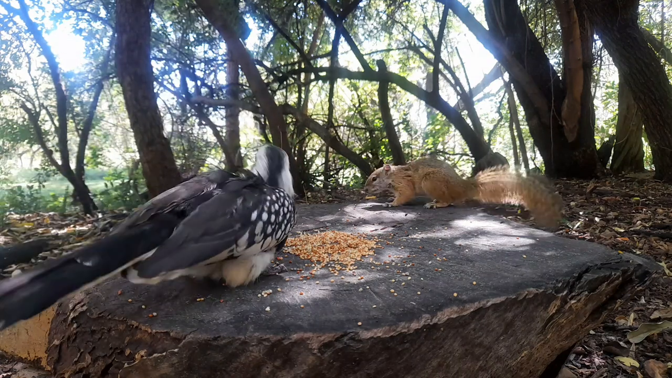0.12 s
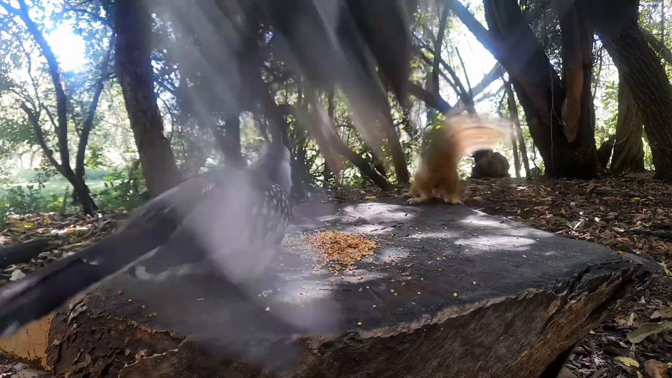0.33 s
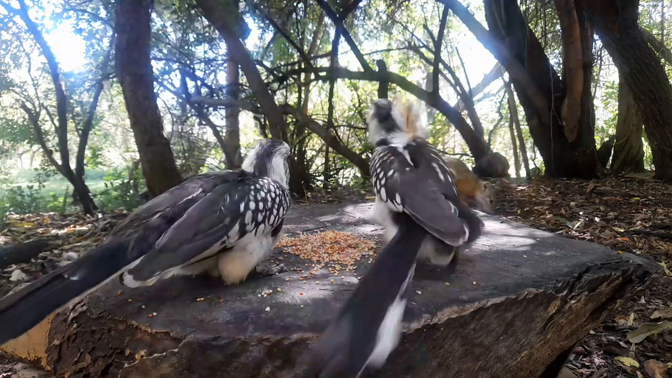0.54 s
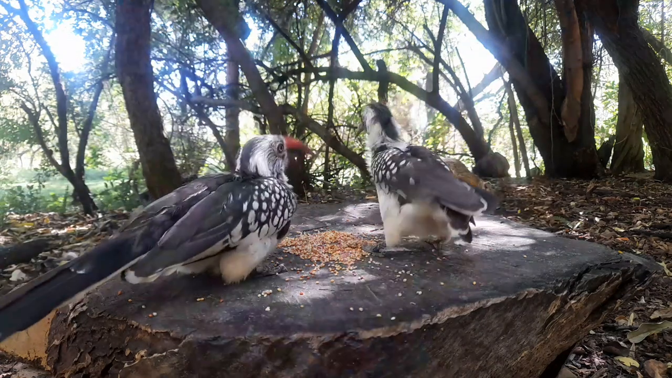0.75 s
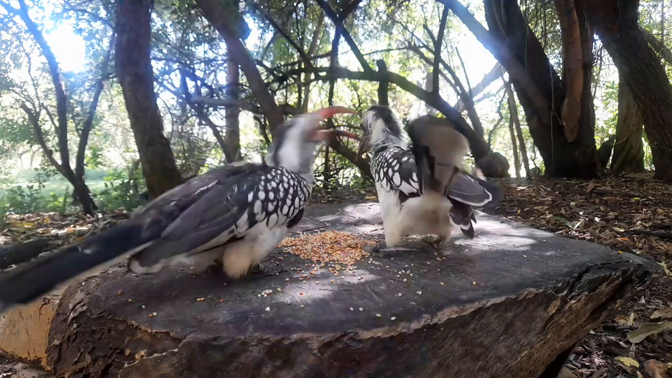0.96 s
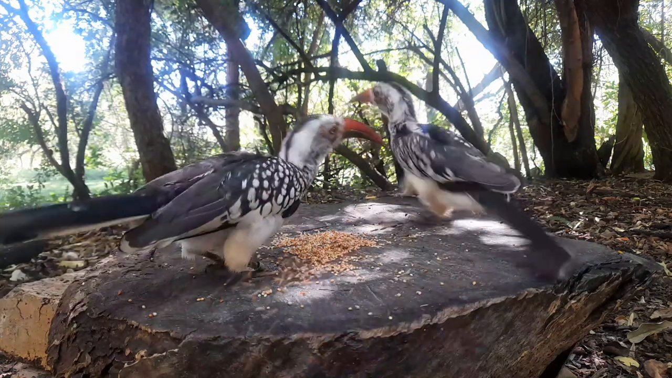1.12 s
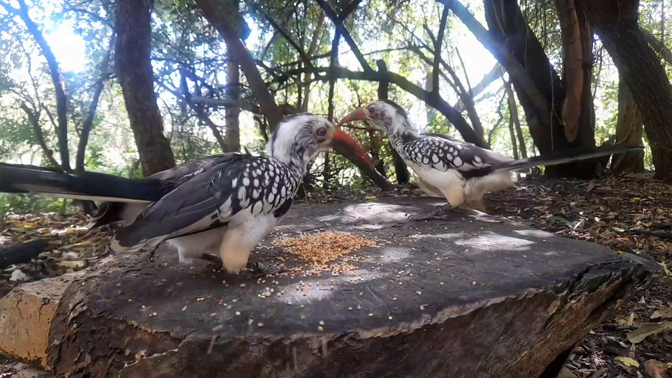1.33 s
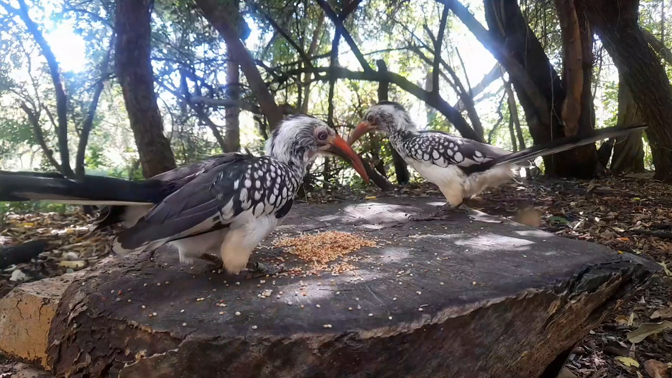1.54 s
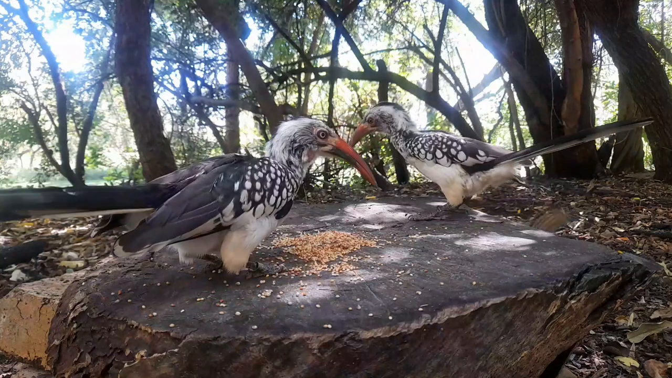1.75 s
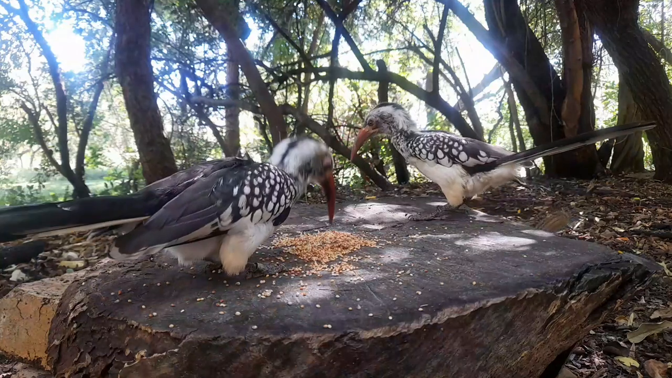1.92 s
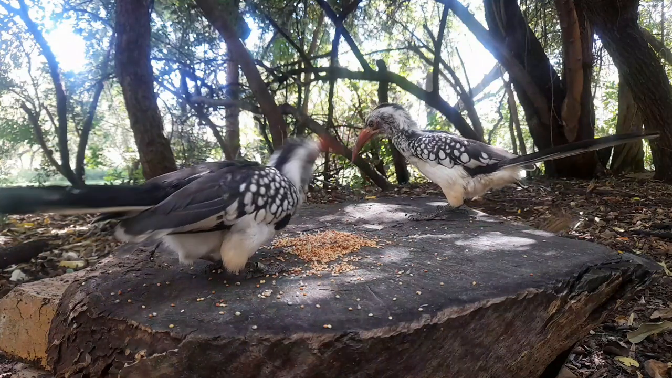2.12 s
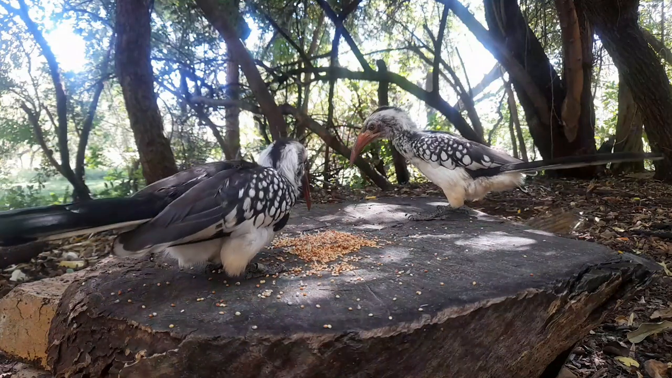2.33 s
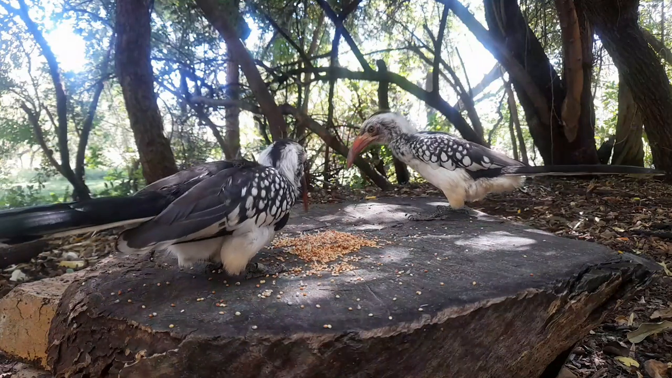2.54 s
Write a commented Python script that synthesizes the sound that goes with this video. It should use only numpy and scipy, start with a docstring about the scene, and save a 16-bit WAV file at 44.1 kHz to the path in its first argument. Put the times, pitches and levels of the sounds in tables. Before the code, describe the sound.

A large bird's wingbeats swish in very close, buffeting the microphone, then slap and thump onto a wooden stump; short clucks, a hop with one sharp flap, scuffs and seed ticks, then quiet woodland with faint hum.

```python
"""Over a faint woodland hiss and a low wavering hum, a hornbill flies in past the microphone.
Its wing strokes swish as band-shaped noise, and soft puffs of noise are its downwash on the microphone.
It lands with slaps and thumps on a seed-strewn stump where another feeds; the birds cluck in gliding tones.
Then it hops with one more flap and grainy scuffs, and seeds tick under its feet as tiny ringing cracks.
The hum swells around the hop, sinks, and swells again at the end."""
import sys
import numpy as np
from scipy import signal
from scipy.fft import rfft, irfft
from scipy.io import wavfile
from scipy.ndimage import uniform_filter1d

SR = 44100
rng = np.random.default_rng(int(sys.argv[2]) if len(sys.argv) > 2 else 0)


def pcm_store(signal):
    """Save signal as 16-bit PCM."""
    levels = np.round(np.clip(np.atleast_2d(signal), -1, 1) * 32767)
    wavfile.write(sys.argv[1], SR, levels.astype(np.int16).T)


N = 114660
T = np.arange(N) / SR  # time in seconds

# Every COLOUR table draws a noise spectrum. Each row: frequency in Hz, level in dB.

# Low hum swelling and sinking. Each row: time in seconds, level in dB.
HUM_LEVEL = [(0, -62), (.82, -66.5), (.95, -56), (1.15, -53.5), (1.45, -52.5), (1.62, -58.5), (1.75, -64),
             (1.97, -70), (2.27, -68.5), (2.43, -58.5), (2.6, -54.5)]
HUM_HZ, HUM_WAVER_SHARE, HUM_OCTAVE_DB = 95.5, 0.015, -23
# Woodland hiss, then low rumble.
AIR_COLOUR = [(130, -2.5), (280, -20.5), (450, -11), (1000, -19.5), (1500, -19.5), (3500, -30.5),
              (6000, -22), (8500, -28.5), (14000, -19)]
RUMBLE_COLOUR = [(20, -41), (40, -11.5), (63, 3), (100, -0.5), (160, -16.5), (300, -18.5), (800, -60.5)]
AIR_DB, RUMBLE_DB = -75, -62.5
ECHO_DB, ECHO_T60_S, ECHO_CUT_HZ = -19.5, 0.17, 5200

# Seeds and claws ticking on wood. Each row: start in seconds, peak in dB before panning,
# left-right difference in dB, ring in Hz.
TICKS = [(0.622, -42.5, 1, 5300), (0.788, -38.5, -6.5, 5100), (1.159, -32, 12, 10870),
         (1.496, -39.5, 17, 7500), (1.544, -38.5, 3, 6900), (1.639, -41, 8, 4600), (1.705, -47.5, 10, 9800)]
TICK_COLOUR = [(1000, -15), (2500, -17), (4500, 2.5), (6500, 1.5), (9000, -5), (15000, 9.5)]
TICK_DECAY_S, TICK_RING_DB, TICK_RING_Q = 0.0008, 4.5, 2.8
# Stretch in which the small ticks scatter: first and last moment in seconds.
SCATTER_SPAN_S = (1.46, 1.74)
SCATTER_PER_S, SCATTER_DB, SCATTER_SPREAD_DB = 170, -55, 6

# Scuffs during the hop. Each row: peak time in seconds, rise in seconds, decay in seconds, level in dB.
SCUFFS = [(1.089, .011, 0.0099, -40.5), (1.134, 0.0011, 0.0017, -45.5), (1.164, 0.0033, 0.0074, -42.5),
          (1.438, 0.0046, 0.0081, -59)]
SCUFF_COLOUR = [(700, -12), (2500, -8.5), (5500, 2), (8500, -8), (14000, -6.5)]
SCUFF_GRAIN_DB, SCUFF_GRAIN_HZ = 4, 600

# Downwash puffs. Each row: peak time in seconds, rise in seconds, decay in seconds,
# level in dB before filtering and panning, left-right difference in dB.
GUSTS = [(0.223, 0.034, 0.02, -40, 2), (.32, 0.09, 0.053, -36.5, -2), (0.37, 0.011, 0.004, -30, 18),
         (0.443, 0.018, 0.011, -32.5, 23), (0.468, 0.0058, 0.0038, -36.5, 33),
         (0.553, 0.06, 0.011, -39, 26), (0.598, 0.0023, 0.0057, -34, 24), (0.643, 0.011, 0.037, -39, 8),
         (0.912, 0.022, 0.015, -42, -13)]
GUST_COLOUR = [(35, -12.5), (70, 2), (100, -5.5), (160, -3.5), (400, -37)]
# Band of the first puff; stronger ones reach higher.
GUST_LOW_HZ, GUST_TOP_HZ, GUST_HZ_PER_DB = 36.7, 127, 4

# Rustle of the plumage. Each row: time in seconds, level in dB.
RUSTLE_LEVEL = [(0, -54.5), (.11, -53.5), (.19, -47), (.29, -48.5), (.40, -48), (.52, -53.5), (.60, -60.5),
                (.70, -73.5), (1.03, -73.5), (1.08, -64), (1.21, -57), (1.36, -69.5), (1.54, -64.5),
                (1.72, -79), (1.82, -83)]
RUSTLE_COLOUR = [(250, -3.5), (550, -12), (800, -11), (1400, -18), (5500, -19), (8200, -27), (12000, -20),
                 (15500, -18.5)]
# Wing strokes through the air. Each row: peak time in seconds, rise in seconds, decay in seconds,
# swish in dB, flutter in dB.
STROKES = [(0.028, 0.0012, 0.0035, -50, -34.5), (0.143, 0.0045, 0.042, -59.5, -45),
           (.231, .002, 0.0036, -44.5, -41), (0.265, 0.006, 0.041, -42, -38)]
FLUTTER_COLOUR = [(150, 0.5), (350, -5.5), (550, 7), (800, -10.5), (1300, -28), (3000, -47)]
# Feathers slapping and brushing. Each row: peak time in seconds, rise in seconds, decay in seconds,
# swish in dB, thump in dB.
SLAPS = [(0.342, 0.0013, 0.0017, -47, -29.5), (0.417, 0.0034, 0.0067, -62, -33.5),
         (0.436, .003, 0.017, -32.5, -33), (0.458, 0.003, 0.0028, -29, -29),
         (0.472, 0.001, 0.0055, -36, -49.5), (0.533, 0.00063, 0.0024, -41.5, -64),
         (1.0892, 0.0002, 0.0033, -26.5, -31.5)]
SLAP_COLOUR = [(200, -16.5), (500, 10.5), (1000, -1.5), (2000, 4.5), (3200, 0.5), (5500, 2.5), (8500, -10),
               (12000, -3.5), (16000, -3)]
THUMP_COLOUR = [(60, -9), (130, 1.5), (250, 10), (370, -4.5), (500, -5.5), (800, -11), (2000, -42.5)]
FEATHER_PAN_DB, THUMP_PAN_DB = 0.5, 5
FEATHER_GRAIN_DB, FEATHER_GRAIN_HZ = 1.5, 510
FEATHER_LUMP_DB, FEATHER_LUMP_HZ = 1.2, 90

# Clucks. Each row: start in seconds, length in seconds, opening pitch in Hz, top pitch in Hz,
# place of the top from 0 to 1, lateness of the glide as a power, level in dB before the loudness curve,
# octave in dB and hoarseness in dB, both at full effort.
CLUCKS = [(.371, 0.044, 523, 597, 0.62, 1.18, -38.5, -7.5, 1.5),
          (0.417, 0.053, 544, 618.5, 0.17, 0.86, -37.5, -6.5, -6),
          (.507, 0.045, 520, 721, 0.73, 1.124, -38, -5, 3.5),
          (0.538, 0.034, 454, 527, 0.81, 1.28, -46.5, 4.5, 4.5),
          (0.626, 0.033, 421, 498, 0.48, 1.34, -50.5, 7, 8.5),
          (0.64, 0.037, 588, 657, 0.71, 1.65, -39.5, -12, -2),
          (0.937, .038, 632, 762, 0.64, 3.4, -41.5, -22, -8.5),
          (1.029, 0.038, 650, 728, 0.64, 1.35, -43.5, -19, 4.5),
          (1.115, 0.0343, 605, 880, 0.63, 3.7, -41, -19.5, -4),
          (1.195, 0.043, 521.3, 758, 0.79, 1.57, -39, -10, -0.5),
          (1.315, 0.026, 648, 720, 0.7, 3, -44.5, -37, -5.5),
          (1.399, 0.054, 471.7, 530, 0.35, 3.6, -51, -0.5, 5),
          (2.022, 0.038, 1090, 980, 0.53, 0.94, -67, -23, -2)]
# Partials above the octave. Each row: multiple of the pitch, level in dB before hoarseness.
OVERTONES = [(3, -26.5), (4, -31)]
RASP_COLOUR = [(800, 5), (2200, -15), (6000, -36)]
RASP_DB = -21.5  # before hoarseness
CLUCK_ATTACK_S, CLUCK_RELEASE_SHARE = 0.006, 0.7
CLUCK_FALL_SHARE, CLUCK_JITTER_SHARE = 0.4, 0.025  # of the pitch

CUTOFF_HZ = 16000


def from_db(db):
    """Decibels to gain."""
    return 10 ** (np.asarray(db) / 20)


def rms_one(x):
    """Scale to unit power."""
    return x / np.sqrt(np.mean(x ** 2) + 1e-20)


def level(rows):
    """Gain over time, gliding in dB from point to point."""
    return from_db(np.interp(T, *np.transpose(rows)))


def pan(db):
    """Left and right gains for a level difference; positive leans left."""
    return from_db(np.array([[db], [-db]]) / 2)


def drift(rate_hz):
    """Smooth random wander of spread 1: white noise through two equal one-pole lowpasses."""
    r = np.exp(-2 * np.pi * rate_hz / SR)
    wander = signal.lfilter([1], [1, -2 * r, r * r], rng.standard_normal(N + SR))
    return rms_one(wander[SR:])  # the first second lets the filter settle


def noise(colour, alike):
    """Stereo noise of a given spectrum; alike runs from 0 (unrelated sides) to 1 (mono)."""
    hz, db = np.transpose(colour)
    f = np.arange(N // 2 + 1) * SR / N + 1
    gain = from_db(np.interp(np.log(f), np.log(hz), db))
    gain = gain * np.minimum(f / hz[0], 1) ** 2  # roll off below the first point
    mid, side = irfft(rfft(rng.standard_normal((2, N))) * gain, N)
    return rms_one(np.sqrt(1 + alike) * mid + np.sqrt(1 - alike) * side * [[1], [-1]])


def evened(x, window_s):
    """Take the slow swings out of a noise, so that an envelope alone shapes it."""
    power = uniform_filter1d(abs(signal.hilbert(x)) ** 2, int(window_s * SR))
    return rms_one(x / np.sqrt(power + 1e-3))


def burst(peak_s, rise_s, decay_s):
    """Envelope that swells exponentially to a peak and dies away."""
    steps = np.maximum((peak_s - T) / rise_s, (T - peak_s) / decay_s)
    return np.exp(-np.minimum(steps, 40))


def background():
    """A low hum whose pitch wavers at random, over faint rumble and hiss."""
    hz = HUM_HZ * (1 + HUM_WAVER_SHARE * drift(3.08))
    phase = 2 * np.pi * np.cumsum(hz) / SR
    tone = np.sin(phase) + from_db(HUM_OCTAVE_DB) * np.sin(2 * phase)
    hum = np.sqrt(2) * level(HUM_LEVEL) * tone
    hiss = from_db(AIR_DB) * noise(AIR_COLOUR, alike=0.08) * pan(-1.0)
    rumble = from_db(RUMBLE_DB) * noise(RUMBLE_COLOUR, alike=0.59) * pan(-3.5)
    return hum + hiss + rumble


def woodland(x):
    """A thin, dull tail scattered back by the trunks, made of decaying noise."""
    tail = rng.standard_normal((2, SR)) * from_db(-60 * T[:SR] / ECHO_T60_S)
    tail = signal.sosfilt(signal.butter(1, ECHO_CUT_HZ, fs=SR, output="sos"), tail)
    echo = signal.fftconvolve(x, rms_one(tail) / np.sqrt(SR), axes=1)[:, :N]
    return from_db(ECHO_DB) * echo


def seeds():
    """Sharp dry cracks, each with a brief resonant ring, and a scatter of smaller ones after the hop."""
    first_s, last_s = SCATTER_SPAN_S
    small = []
    for when, loud, side, pitch in rng.random((int(SCATTER_PER_S * (last_s - first_s)), 4)):
        start_s = first_s + when * (last_s - first_s)
        db = SCATTER_DB + SCATTER_SPREAD_DB * (2 * loud - 1)
        small.append((start_s, db, 8 * side, 4000 * 2 ** pitch))
    out, crack = np.zeros((2, N)), noise(TICK_COLOUR, alike=0.12)
    size = SR // 100
    for start_s, db, side_db, ring_hz in list(TICKS) + small:
        i = int(start_s * SR)
        tick = crack[:, i:i + size] * np.exp(-T[:size] / TICK_DECAY_S)
        ring = signal.lfilter(*signal.iirpeak(ring_hz, TICK_RING_Q, fs=SR), tick)
        tick = tick + from_db(TICK_RING_DB) * ring
        out[:, i:i + size] += from_db(db) * pan(side_db) * tick / abs(tick).max()
    return out


def scuffs():
    """Thin, grainy brushing of feathers and feet over the wood: noise roughened by fast level changes."""
    contact = sum(from_db(db) * burst(s, rise, decay) for s, rise, decay, db in SCUFFS)
    grain = rms_one(from_db(SCUFF_GRAIN_DB * drift(SCUFF_GRAIN_HZ)))
    return contact * grain * noise(SCUFF_COLOUR, alike=0.36)


def downwash():
    """Puffs of air from the wings rumble on the microphone, mostly on one side; gentle ones are duller."""
    air, out = evened(noise(GUST_COLOUR, alike=0.484), window_s=0.045), 0
    first_db = GUSTS[0][3]
    for s, rise, decay, db, side_db in GUSTS:
        top_hz = GUST_TOP_HZ + GUST_HZ_PER_DB * (db - first_db)
        top_hz = np.clip(top_hz, 2 * GUST_LOW_HZ, SR / 100)
        band = signal.butter(3, [GUST_LOW_HZ, top_hz], "band", fs=SR, output="sos")
        puff = signal.sosfilt(band, burst(s, rise, decay) * air)
        out = out + from_db(db) * pan(side_db) * puff
    return out


def wings():
    """Feathers rub in fine grains of noise; strokes add a hollow flutter, slaps a thump."""
    fine = FEATHER_GRAIN_DB * drift(FEATHER_GRAIN_HZ)
    lumps = FEATHER_LUMP_DB * drift(FEATHER_LUMP_HZ)
    grain = rms_one(from_db(fine + lumps))
    swish, flutter, slap, thump = level(RUSTLE_LEVEL), 0, 0, 0
    for s, rise, decay, swish_db, flutter_db in STROKES:
        stroke = burst(s, rise, decay)
        swish = swish + from_db(swish_db) * stroke
        flutter = flutter + from_db(flutter_db) * stroke
    for s, rise, decay, slap_db, thump_db in SLAPS:
        hit = burst(s, rise, decay)
        slap = slap + from_db(slap_db) * hit
        thump = thump + from_db(thump_db) * hit
    feathers = swish * noise(RUSTLE_COLOUR, alike=0.044) + slap * noise(SLAP_COLOUR, alike=0.37)
    hollow = flutter * evened(noise(FLUTTER_COLOUR, alike=0.91), window_s=0.017)
    body = thump * evened(noise(THUMP_COLOUR, alike=0.67), window_s=0.0071)
    return grain * feathers * pan(FEATHER_PAN_DB) + hollow + body * pan(THUMP_PAN_DB)


def clucks():
    """Short notes glide to a top pitch and drop as they close, brightest and raspiest while loud."""
    out = np.zeros(N)
    waver = 1 + CLUCK_JITTER_SHARE * drift(160)
    rasp = noise(RASP_COLOUR, alike=0.72)[0]
    for start_s, length_s, opening_hz, top_hz, top, lateness, db, octave_db, hoarse_db in CLUCKS:
        u = (T - start_s) / length_s  # progress through the note, 0 to 1
        on = (u > 0) & (u < 1)
        u = u[on]
        glide = (1 - np.cos(np.pi * np.minimum(u / top, 1) ** lateness)) / 2
        fall = CLUCK_FALL_SHARE * (np.maximum(u - top, 0) / (1 - top)) ** 1.5
        hz = (opening_hz + (top_hz - opening_hz) * glide) * (1 - fall)
        phase = 2 * np.pi * np.cumsum(hz * waver[on]) / SR
        attack = np.minimum(u * length_s / CLUCK_ATTACK_S, 1)
        effort = attack * np.minimum((1 - u) / CLUCK_RELEASE_SHARE, 1)
        upper = sum(from_db(d) * np.sin(k * phase) for k, d in OVERTONES)
        upper = upper + from_db(RASP_DB) * rasp[on] * (1 + np.cos(phase))  # rasp pulses with the voice
        octave = np.sqrt(effort) * from_db(octave_db) * np.sin(2 * phase)
        tone = np.sin(phase) + octave + effort * from_db(hoarse_db) * upper
        out[on] += np.sqrt(2) * from_db(db) * effort * tone
    return out


def scene():
    """The wood behind, the seeds and downwash, and the birds with their echo."""
    birds = scuffs() + wings() + clucks()
    return background() + seeds() + downwash() + woodland(birds) + birds


def record(dry):
    """A steep elliptic lowpass cuts the top."""
    return signal.sosfilt(signal.ellip(10, .2, 70, CUTOFF_HZ, fs=SR, output="sos"), dry)


dry = scene()
out = record(dry)
pcm_store(out)
```